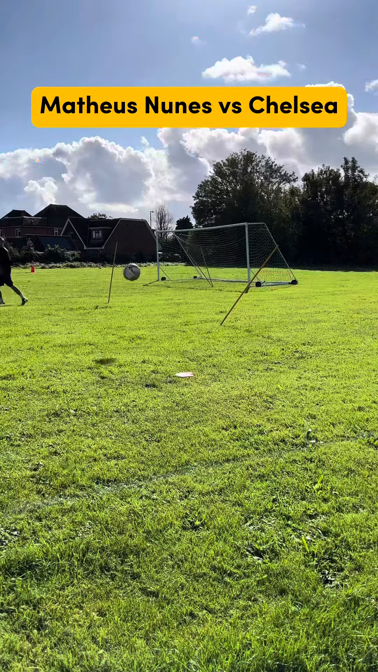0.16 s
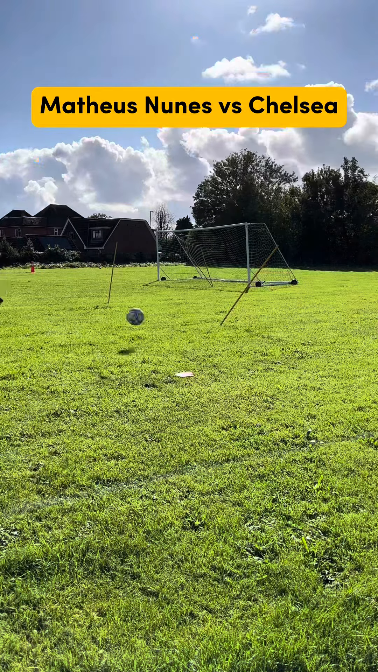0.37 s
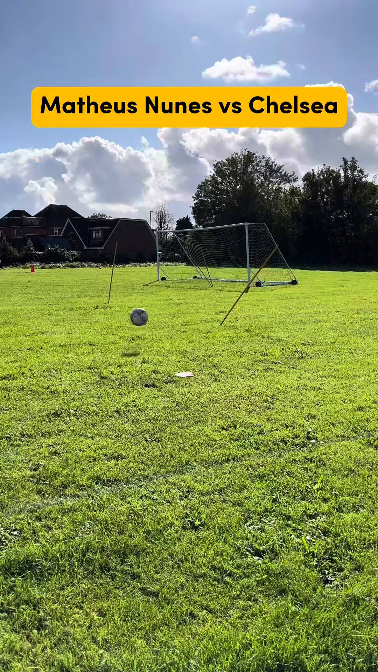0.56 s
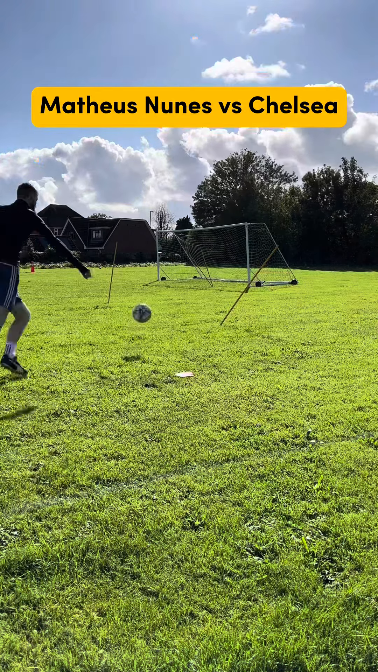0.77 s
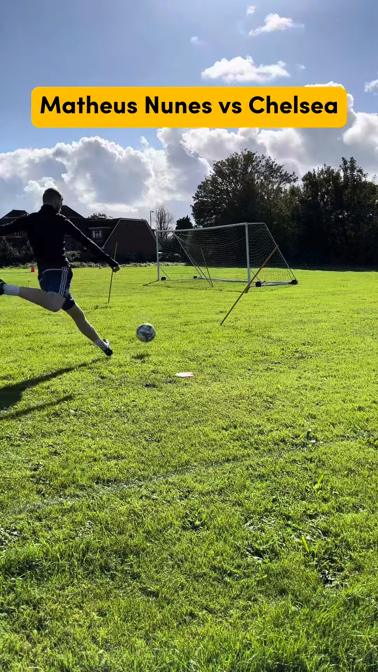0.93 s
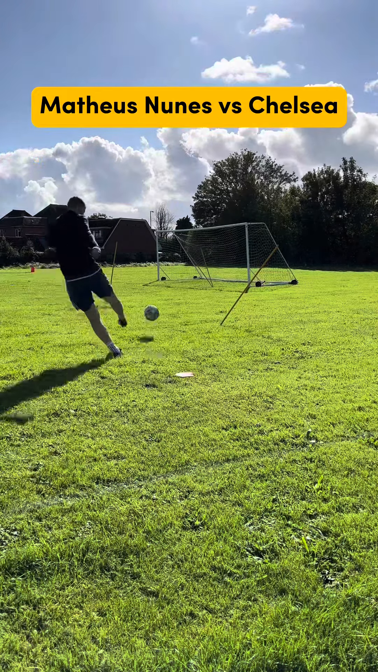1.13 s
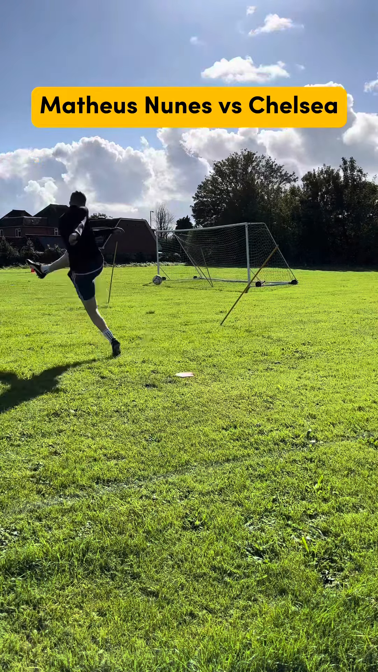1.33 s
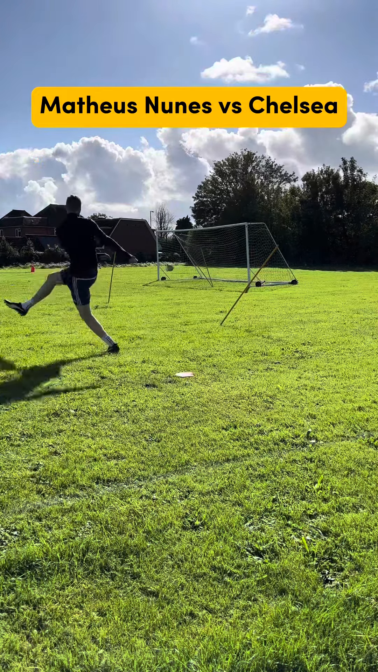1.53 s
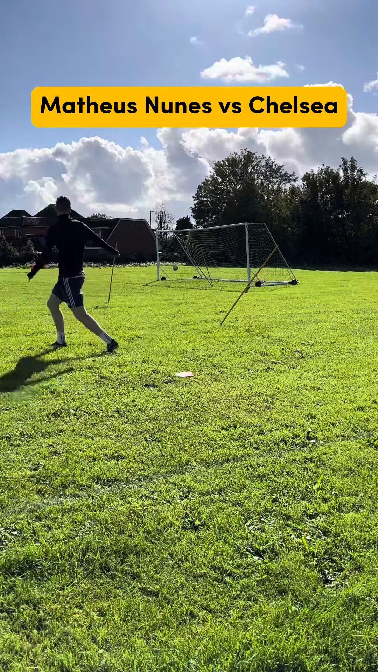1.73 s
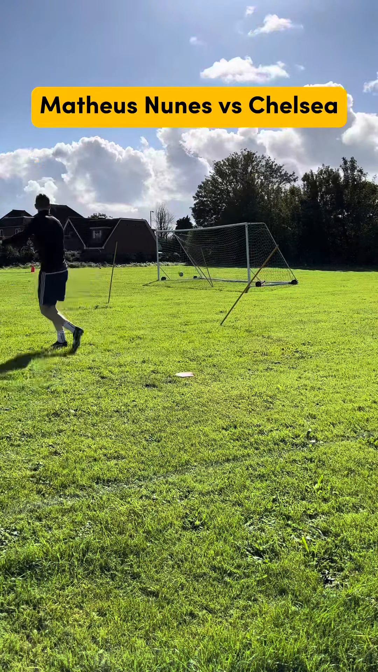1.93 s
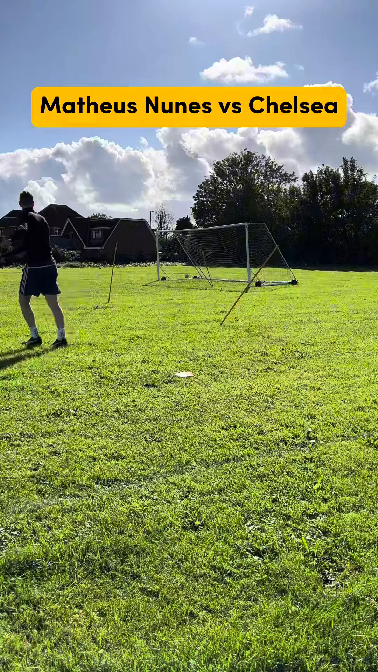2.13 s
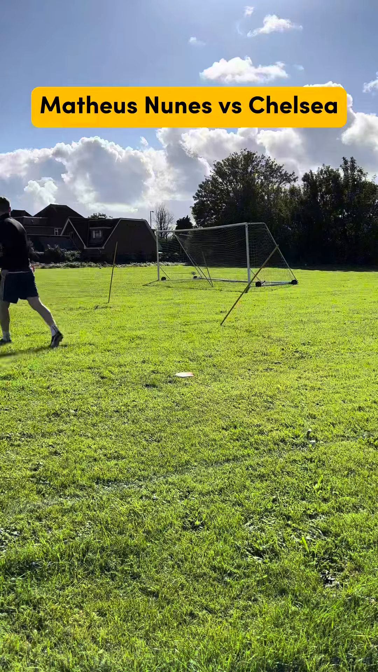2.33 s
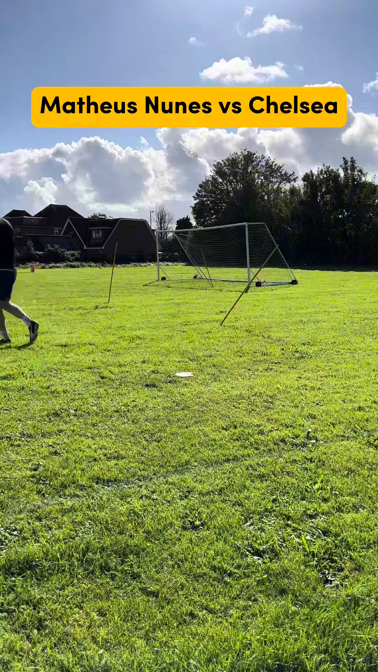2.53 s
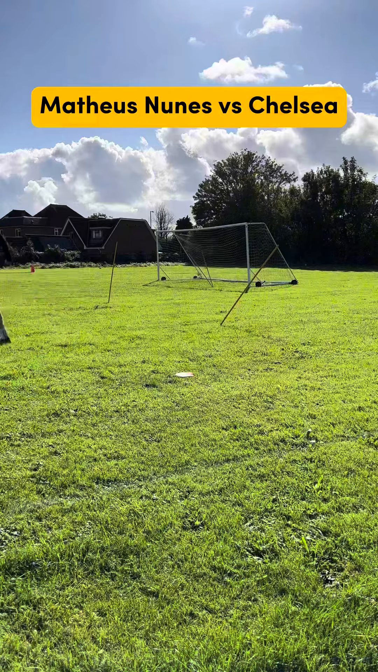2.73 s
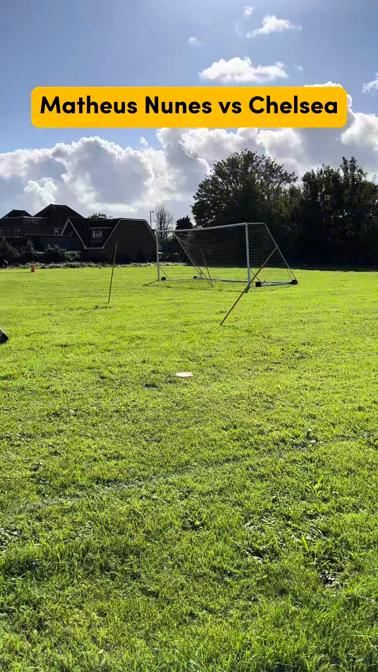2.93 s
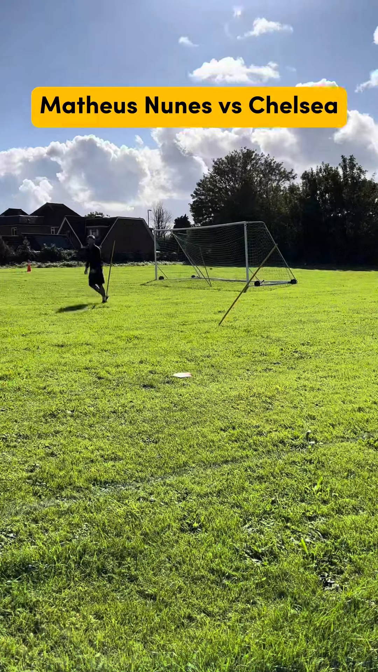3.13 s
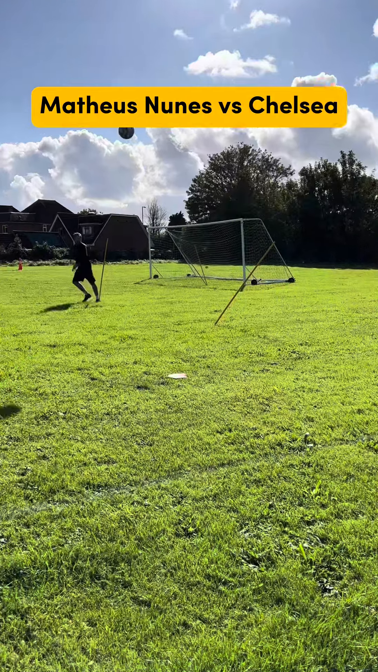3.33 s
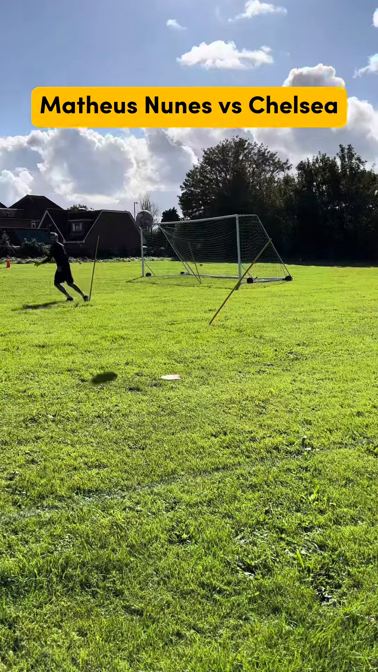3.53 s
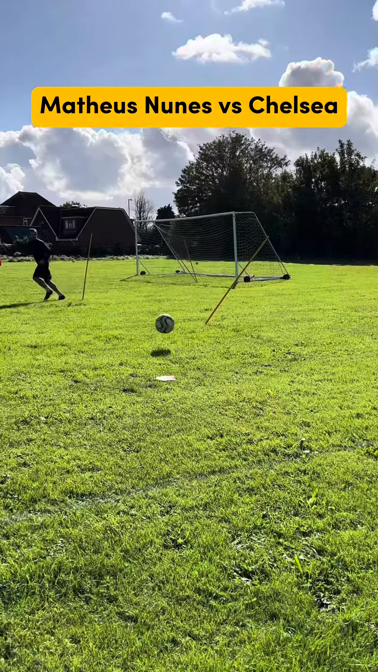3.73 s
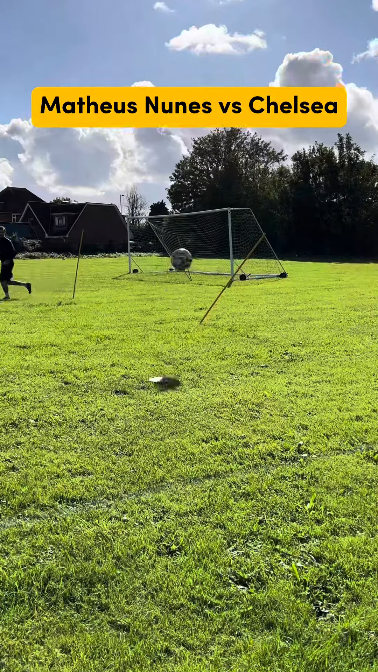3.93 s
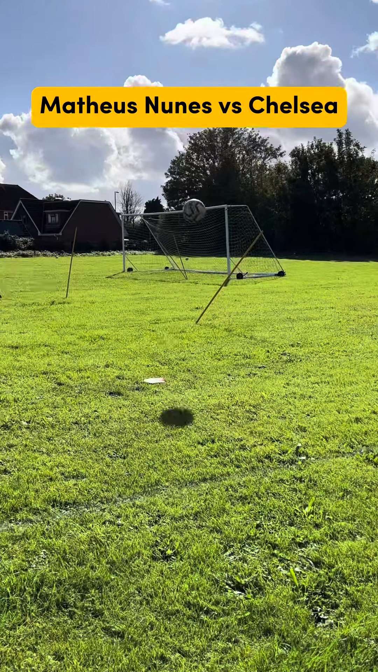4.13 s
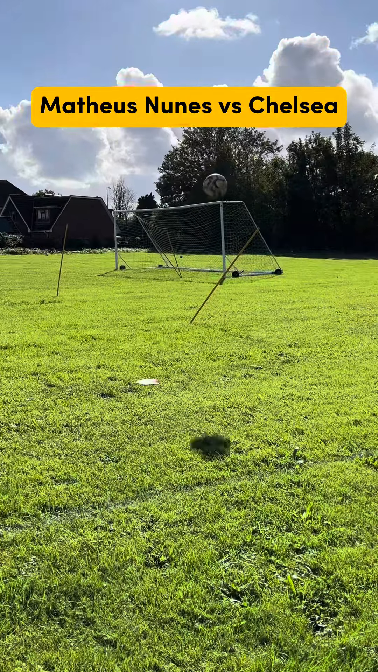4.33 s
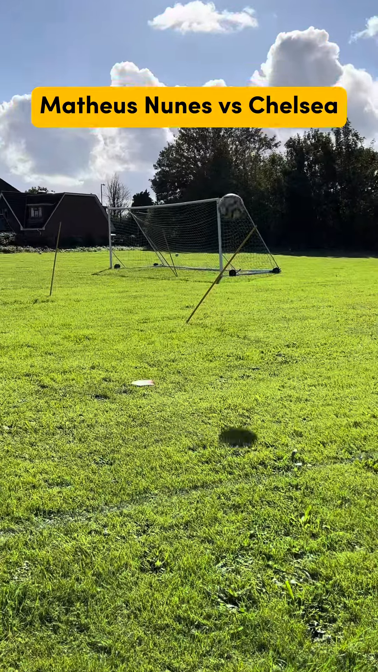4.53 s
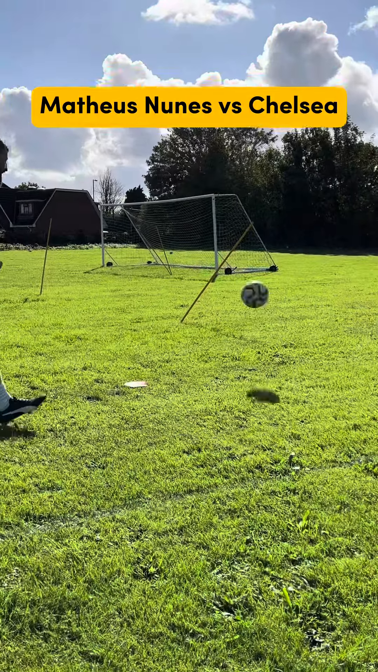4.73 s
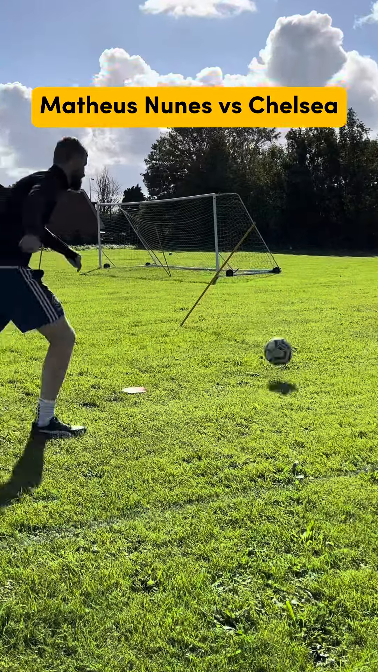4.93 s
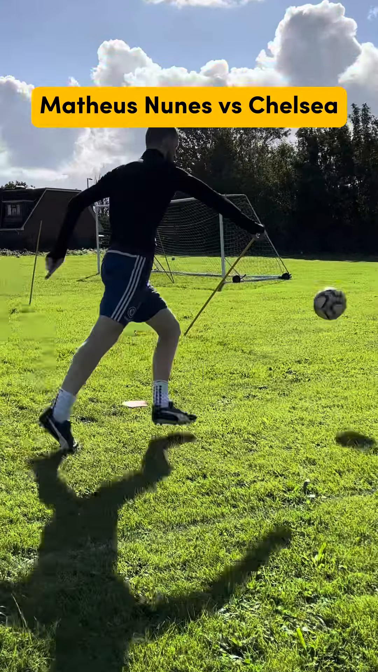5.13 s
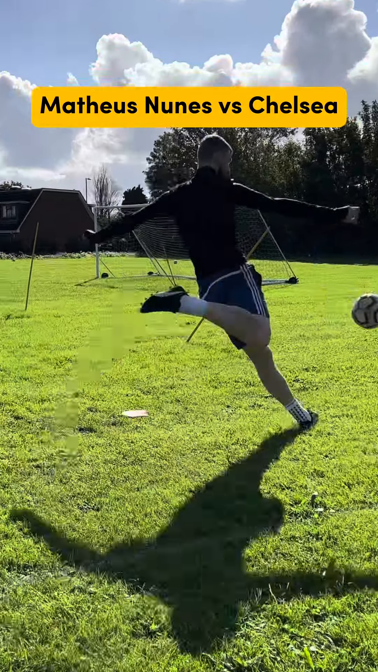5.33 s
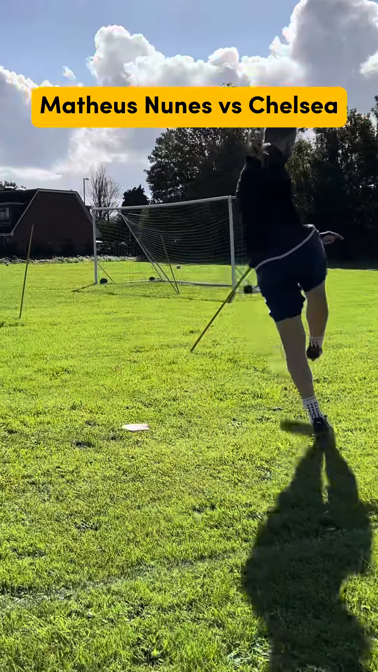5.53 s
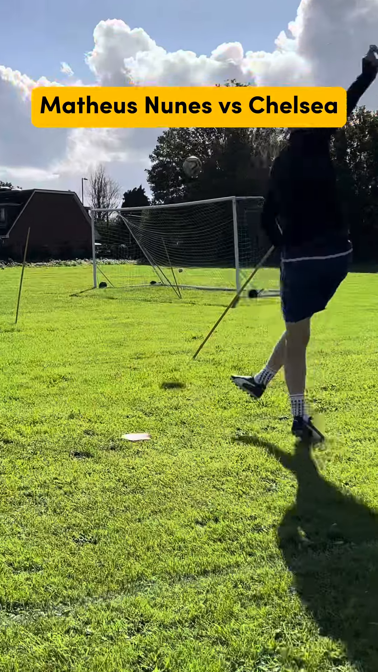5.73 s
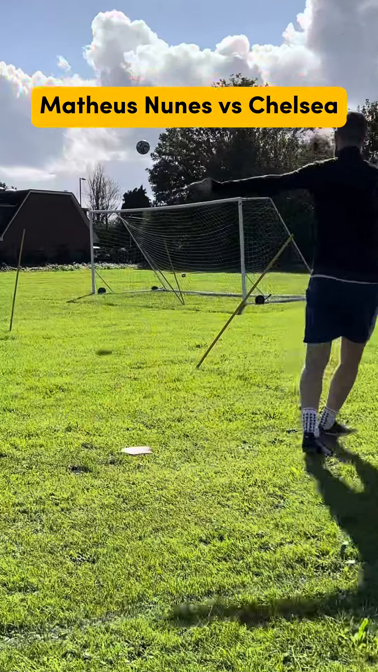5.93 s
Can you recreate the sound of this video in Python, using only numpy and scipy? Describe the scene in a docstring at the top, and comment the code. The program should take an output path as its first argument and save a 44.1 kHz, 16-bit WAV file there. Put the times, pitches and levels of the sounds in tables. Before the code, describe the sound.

Outdoors on a quiet grass pitch, picked up by a phone a few metres away. Soft footsteps and a weak bounce lead to a loud, slapping, low kick, then dull echoes off houses. A second later the ball clacks faintly against the goal and rattles. A firmer turf bounce, another softer one and light steps follow, then a second, closer and sharper kick. Distant town rumble and hiss throughout.

```python
"""Football kicks and bounces on grass

A ball bounces on turf and is kicked hard, twice, a few metres from a phone; the first shot hits a goal, whose
frame rings high. Each contact slaps the skin, squeezes out a low thump and rings shell and inner air as damped
modes. Footsteps and a leg swing are swells of crackling noise; houses, trees and field return delayed, filtered
copies. Behind: faint high pings and a distant town of wavering, coloured noise."""
import sys
import numpy as np
from scipy import signal
from scipy.fft import rfft, irfft, next_fast_len
from scipy.io import wavfile

SR = 44100
rng = np.random.default_rng(int(sys.argv[2]) if len(sys.argv) > 2 else 0)


def generate_wav(signal):
    """Clip the signal to [-1, 1] and save it as 16-bit WAV at the path in sys.argv[1]."""
    frames = np.transpose(np.atleast_2d(signal))
    scaled = np.clip(frames, -1, 1) * 32767
    pcm = np.round(scaled).astype(np.int16)
    wavfile.write(sys.argv[1], SR, pcm)


N = 268524
T = np.arange(N) / SR
SIZE = next_fast_len(N + SR)
HZ = np.maximum(np.arange(SIZE // 2 + 1) * SR / SIZE, 1)
SIDES = np.array([[1], [-1]])  # left, right

# kicks: (time [s], level [dB], thump [Hz], slap corner [Hz], hardness [Hz], skin pitch [Hz],
# skin ring [dB], snap at release [dB], distance [m])
KICKS = [(1.0722, 2.5, 136, 280, 734, 892, -0.5, 2.5, 6.7),
         (5.4351, 1.5, 115, 141.4, 2500, 1360, 1.5, -6.5, 4.5)]


def undb(db):
    """Decibels to gain."""
    return 10 ** (np.asarray(db) / 20)


def across(points):
    """Read a (Hz, value) table at every frequency, linear in log frequency."""
    hz, value = np.transpose(points)
    return np.interp(np.log(HZ), np.log(hz), value)


def filtered(x, response):
    """Apply a frequency response."""
    return irfft(rfft(x, SIZE) * response, SIZE)[..., :N]


def unit(x):
    """Scale to rms 1."""
    return x / np.std(x)


def noise(points, grain_db=0):
    """Coloured noise of rms 1; uneven grain sizes make it crackle."""
    size = np.minimum(rng.exponential(size=N), 2 * np.pi)
    grains = rng.standard_normal(N) * undb(grain_db * size)
    return unit(filtered(grains, undb(across(points))))


def walk(rate_per_s):
    """Random wander: straight lines between normal draws."""
    return np.interp(T * rate_per_s, np.arange(N // 100), rng.standard_normal(N // 100))


def ring(t, hz, t60_s):
    """A damped mode, silent before t = 0."""
    t = np.maximum(t, 0)
    return np.sin(2 * np.pi * hz * t) * np.exp(-np.log(1000) * t / t60_s)


def spike(t, corner_hz, edge_hz):
    """A pressure spike that rises fast (edge) and relaxes more slowly (corner)."""
    t = np.maximum(t, 0)
    return np.exp(-2 * np.pi * corner_hz * t) - np.exp(-2 * np.pi * edge_hz * t)


def swell(s, length_s):
    """A smooth rise and fall around time s."""
    return np.exp(-np.minimum(((T - s) / length_s) ** 2, 50))


def town():
    """A wavering rumble shared by both sides under a wide, steady hiss."""
    # distant town: (frequency [Hz], density [dB per Hz])
    town_colour = [(22, -43), (45, -2), (96, -4), (140, -10), (305, -21.5), (550, -26.5), (1080, -28.5),
                   (2500, -38), (3800, -35), (4800, -36.5), (5600, -44.5), (8200, -45), (10200, -64.5),
                   (15500, -58.5)]
    # its side signal relative to the middle: (frequency [Hz], level [dB])
    side_share = [(60, -15), (110, -21.5), (200, -13.5), (380, -7.5), (700, 3.5), (1290, -4), (2380, 0.5),
                  (4400, -1), (8120, -4), (15000, 3.5)]
    town_db = -48.5
    rumble_waver_db, rumble_waver_per_s = 2.5, 12
    roar_waver_db, roar_waver_per_s = 0.81, 4.233
    mid = noise(town_colour)
    side = filtered(noise(town_colour), undb(across(side_share)))
    air = mid + SIDES * side
    rumble = filtered(air, 1 / (1 + (HZ / 220) ** 4))
    hiss = filtered(air, 1 / (1 + (1800 / HZ) ** 4))
    roar = air - rumble - hiss
    rumble = rumble * undb(rumble_waver_db * walk(rumble_waver_per_s))
    roar = roar * undb(roar_waver_db * walk(roar_waver_per_s))
    return undb(town_db) * (rumble + roar + hiss)


def pings():
    """Faint high rings, each blurred to its own degree by a quick flutter in level and pitch."""
    # high pings: (time [s], pitch [Hz], level [dB], flutter [0-1]); the rows near 4.6 kHz after 2 s are the
    # goal frame ringing after the shot
    ping_list = [(0.038, 3650, -55.5, 0.27), (0.17, 3500, -64, 0.05), (2.064, 4570, -58, 0.9),
                 (2.155, 4560, -61.5, 1)]
    t60_s = 0.52
    out = np.zeros(N)
    for s, hz, db, flutter in ping_list:
        level = undb(db + 4.7 * flutter * walk(90))
        jitter_s = .5 * flutter * walk(220) / hz
        out += level * ring(T - s + jitter_s, hz, t60_s)
    return out


def park(x):
    """Dull echoes off houses, a low roll from the tree line and a faint scatter from the field."""
    # echoes from houses: (delay [s], level [dB], treble corner [Hz])
    house_echoes = [(.06, -52, 2500), (0.094, -43, 2500), (.239, -25.5, 240), (.29, -34, 344),
                    (.625, -34, 170.2)]
    echoes = sum(undb(db) * np.exp(-2j * np.pi * HZ * delay) / (1 + 1j * HZ / hz) ** 2
                 for delay, db, hz in house_echoes)
    field = noise([(40, -26.0), (150, -4.5), (400, -15), (1200, -17.0), (4000, -9), (9000, -4)])
    field = field * spike(T, 0.71, 13.0)
    trees = noise([(40, 5.5), (140, -1.5), (230, -2.0), (400, -20), (2000, -40)])
    trees = trees * np.exp(-((T - .38) / .12) ** 2)
    # impulse responses scaled to unit energy, then to level
    scatter = undb(-26.0) * field / np.linalg.norm(field) + undb(-51.5) * trees / np.linalg.norm(trees)
    return filtered(x, echoes + rfft(scatter, SIZE))


def footsteps(swish, scuff):
    """Steps bend crackling blades, scuff turf and pat low; heavy ones pat more and swish less."""
    # steps: (time [s], level [dB], weight [dB]: heavy landings above 0, light brushes below)
    steps = [(.012, -52, -0.5), (.425, -61, -19), (0.481, -52, 6), (.753, -59, -8), (.957, -52, 6),
             (1.33, -62, -18), (1.378, -50.5, 11.5), (1.699, -52, 8.5), (3.945, -65, -20),
             (4.162, -55.5, 3), (4.605, -49.5, -4), (4.826, -57, -10), (5.15, -59, -12),
             (5.292, -53.5, -22.5), (5.674, -55.5, -15), (5.916, -54, -2)]
    step_s, swish_db, swish_db_per_weight_db, pat_db = 0.031, -4.5, -0.38, 1
    crunch_db, crunch_per_s = 2.2, 130
    follow_delay_s, follow_s, follow_db_at_1m = 0.075, 0.093, -40.5
    pat = noise([(30, -37), (70, 8.5), (160, -1.5), (350, -37), (1000, -77)])
    crunch = undb(crunch_db * walk(crunch_per_s))
    out = np.zeros(N)
    for s, db, weight_db in steps:
        blades = scuff + undb(swish_db + swish_db_per_weight_db * weight_db) * swish
        step = crunch * blades + undb(pat_db + weight_db) * pat
        out += undb(db) * swell(s, step_s) * step
    # after each kick the leg swings through and brushes the grass
    for s, *_, metres in KICKS:
        brush = crunch * (scuff + undb(-1.5) * swish)
        out += undb(follow_db_at_1m) / metres * swell(s + follow_delay_s, follow_s) * brush
    return out


def contact(s, contact_s, thump_hz, hard_hz, skin_hz, slap_db, slap_hz, shell_db, release_db,
            skin_db, skin_t60, crack_db, cavity_db, bite_db=0, ring_db=0, snap_db=0):
    """The skin slaps on contact, the ball squashes and swings back, and it snaps free at release."""
    # flexing modes of the shell: (pitch [Hz], level [dB], t60 [s])
    shell_modes = [(256, -8.5, 0.0323), (344, -20.5, 0.12), (441, -11, 0.064)]
    # modes of the struck panel: (multiple of skin pitch, level [dB], share of skin t60)
    skin_modes = [(.48, -1, 0.35), (1, -1.5, 1), (1.38, -5.5, 0.47), (1.68, -9, .25), (3.08, -4, 0.14)]
    # air modes inside the ball: (pitch [Hz], level [dB], t60 [s])
    cavity_modes = [(988, 2.5, 0.12), (1654, -1, 0.06), (2070, -14, 0.11), (2710, 6, 0.033),
                    (3800, -15, 0.04)]
    # crack of the skin: (frequency [Hz], level [dB])
    crack_colour = [(400, -12), (1100, 5.5), (1900, 2.5), (2700, 3.5), (4200, -0.5), (6000, -8),
                    (8000, -10), (10500, -21.5), (13000, -20), (16000, -15)]

    def panel(age):
        """Sum the damped modes of the struck panel."""
        return sum(undb(db) * ring(age, multiple * skin_hz, share * skin_t60)
                   for multiple, db, share in skin_modes)

    out, span = np.zeros(N), (T >= s) & (T < s + .5)
    t = T[span] - s
    free = t - contact_s
    # the thump sinks in pitch as the squeeze relaxes
    thump = ring((t - .0008) / (1 + t / 0.069), thump_hz, 0.33)
    thump = thump * np.exp(-(t / (1.25 * contact_s)) ** 2)
    # a higher hard_hz sharpens the edge
    touch = spike(t, slap_hz, hard_hz) ** 2
    slap = -undb(slap_db) * touch / touch.max()
    snap = undb(release_db + snap_db) * spike(free, 330, 900)
    shell = -sum(undb(db) * ring(t, hz, t60_s) for hz, db, t60_s in shell_modes)
    # the skin rings at first touch and again at release
    skin = 1.2 * panel(t) * spike(t, 30, 700)
    skin = skin + 1.4 * undb(snap_db) * panel(free) * spike(free, 30, 160)
    cavity = sum(undb(db) * ring(t, hz, t60_s) for hz, db, t60_s in cavity_modes)
    # the panels crack at first touch, creak while pressed and tick as they let go
    crack_level = spike(t, 117, 460) + .11 * spike(t, 21.6, 400) + .16 * spike(free, 110, 700)
    crack = noise(crack_colour)[span] * crack_level
    bright = snap + undb(skin_db + ring_db) * skin + undb(cavity_db) * cavity + undb(crack_db) * crack
    out[span] = thump + slap + undb(shell_db) * shell + undb(bite_db) * bright
    return out


def goal(scuff):
    """The first shot meets the goal: a clack, then the knock of the ball, then rattles."""
    # ball against goal: part levels [dB re thump], slap corner [Hz], skin t60 [s]
    goal_answer = dict(slap_db=9.5, slap_hz=251, shell_db=3.5, release_db=-24, skin_db=-0.5, skin_t60=0.016, crack_db=-24, cavity_db=-21)
    # rattles: (time [s], level [dB])
    rattles = [(2.129, -50), (2.212, -51)]
    goal_s, clack_lead_s, clack_db, knock_db, rattle_s = 2.0667, 0.0144, -38, -30.5, 0.027
    clack = noise([(400, 7), (1200, -0.5), (3000, 0), (5500, -10), (14000, -17)])
    clack = clack * spike(T - goal_s + clack_lead_s, 9.6, 930)
    knock = contact(goal_s, contact_s=.0054, thump_hz=159, hard_hz=800, skin_hz=1030, **goal_answer)
    rattle = scuff * sum(undb(db) * swell(s, rattle_s) for s, db in rattles)
    return undb(clack_db) * clack + undb(knock_db) * knock + rattle


def bounces(swish, scuff):
    """The ball thuds on turf, crushing blades as it lands and scuffing as it leaves."""
    # bounces: (time [s], level [dB], thump [Hz], hardness [Hz], contact time [s])
    landings = [(0.4061, -20, 128, 190, 0.012), (3.7365, -7, 114, 365, .0118),
                (4.8526, -16, 107, 483, .0146)]
    # ball against turf: part levels [dB re thump, before bite], slap corner [Hz], skin t60 [s]
    turf_answer = dict(slap_db=-12, slap_hz=140, shell_db=-18.5, release_db=-10, skin_db=-24.5, skin_t60=0.011, crack_db=-37, cavity_db=-68)
    ref_hard_hz, skin_hz, bite_db_per_octave = 369, 1170, 11
    crush_s, crush_swish_db, crush_scuff_db = .005, -33, -33
    out = np.zeros(N)
    for s, db, thump_hz, hard_hz, contact_s in landings:
        # a harder bounce rings and snaps more
        bite_db = bite_db_per_octave * np.log2(hard_hz / ref_hard_hz)
        thud = contact(s, contact_s, thump_hz, hard_hz, skin_hz, bite_db=bite_db, **turf_answer)
        crush = undb(crush_swish_db) * swish * swell(s, crush_s)
        scrape = undb(crush_scuff_db) * scuff * swell(s + contact_s, crush_s)
        out += undb(db) * (thud + crush + scrape)
    return out


def kicks():
    """The boot strikes the ball; the farther the kick, the stronger its echoes by comparison."""
    # ball against boot: part levels [dB re thump, before ring and snap], skin t60 [s]
    boot_answer = dict(slap_db=0.5, shell_db=-14, release_db=-14.5, skin_db=-10, skin_t60=0.033, crack_db=-12.5, cavity_db=-34)
    contact_s = .0118
    echo_ref_m = 4.84  # a kick this far away has echoes as listed
    direct, send = np.zeros(N), np.zeros(N)
    for s, db, thump_hz, slap_hz, hard_hz, skin_hz, ring_db, snap_db, metres in KICKS:
        hit = undb(db) * contact(s, contact_s, thump_hz, hard_hz, skin_hz, slap_hz=slap_hz,
                                 ring_db=ring_db, snap_db=snap_db, **boot_answer)
        direct += hit
        send += hit * metres / echo_ref_m
    return direct, send


def scene():
    """Pitch sounds reach the two microphone ports out of step; the town comes from all round."""
    # grass blades: (frequency [Hz], level [dB])
    swish_colour = [(500, -4), (2000, -1), (4200, -2), (6000, -4), (8000, -6), (10500, -11), (13000, -12),
                    (16000, 0)]
    # turf: (frequency [Hz], level [dB])
    scuff_colour = [(120, 6), (400, 2), (1400, -4.5), (2500, -16), (6000, -32)]
    # phase lead of the left port: (frequency [Hz], phase [rad])
    port_lead = [(60, 0), (300, -.45), (800, -.9), (1400, 0), (2500, 1.8), (3400, .9), (4400, .7),
                 (5000, 1.8), (5500, 3.1), (7500, 6.2), (10200, 9.4), (15500, 16)]
    bounce_echo_db = -6
    swish, scuff = noise(swish_colour, grain_db=3.5), noise(scuff_colour, grain_db=5)
    kicked, send = kicks()
    bounced = bounces(swish, scuff)
    echoes = park(send + undb(bounce_echo_db) * bounced)
    pitch = kicked + bounced + echoes + goal(scuff) + footsteps(swish, scuff) + pings()
    return filtered(pitch, np.exp(.5j * SIDES * across(port_lead))) + town()


def record(dry):
    """The phone turns phase about once an octave, so lows come late; it rounds peaks and cuts the top."""
    # left minus right: (frequency [Hz], level [dB])
    port_balance = [(40, 0.5), (150, 1), (550, 3), (1100, -1.8), (2500, 0), (8000, 0)]
    turn_hz, turn_step = 55.3, 2.114  # lowest phase turn, ratio from each to the next
    top_hz = 15500
    response = undb(SIDES * across(port_balance) / 2)
    for stage in range(5):  # all-pass: each thud sweeps down
        s = 1j * HZ / (turn_hz * turn_step ** stage)
        response = response * (s * s - np.sqrt(2) * s + 1) / (s * s + np.sqrt(2) * s + 1)
    x = filtered(dry, response)
    rounded = x / (1 + x ** 8) ** (1 / 8)
    return signal.sosfilt(signal.ellip(10, .2, 80, top_hz, fs=SR, output="sos"), rounded)


dry = scene()
out = record(dry)
generate_wav(out)
```